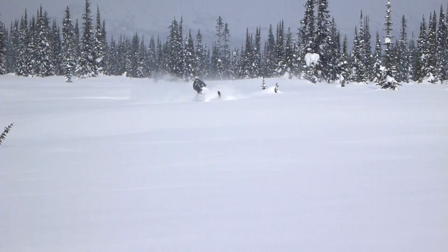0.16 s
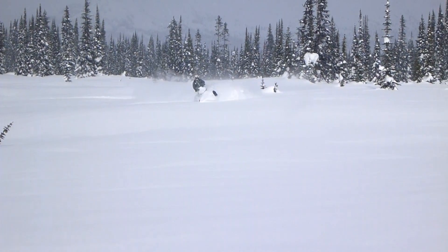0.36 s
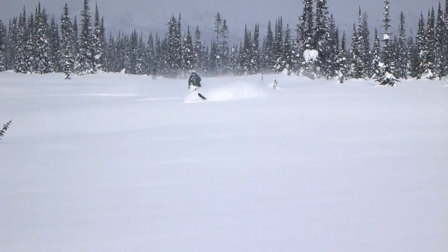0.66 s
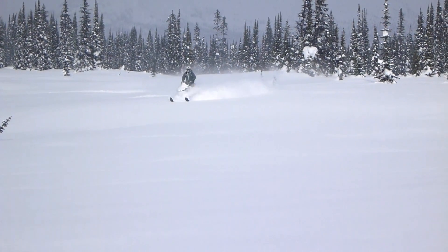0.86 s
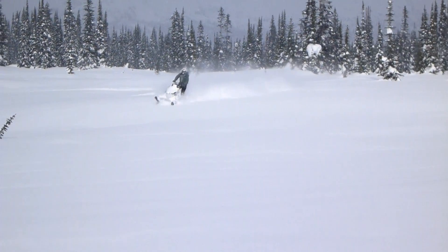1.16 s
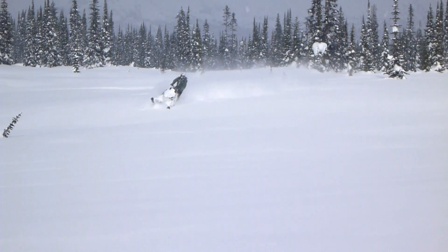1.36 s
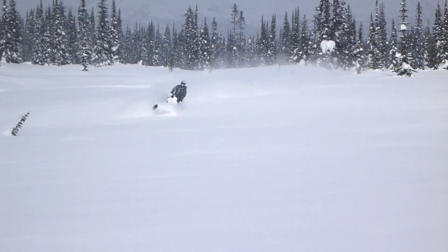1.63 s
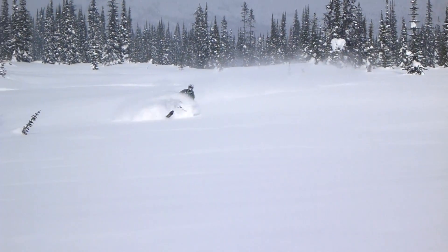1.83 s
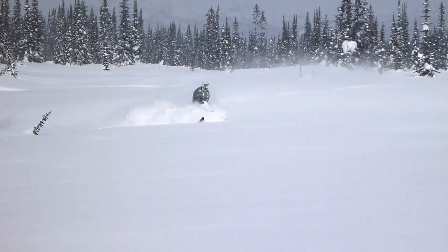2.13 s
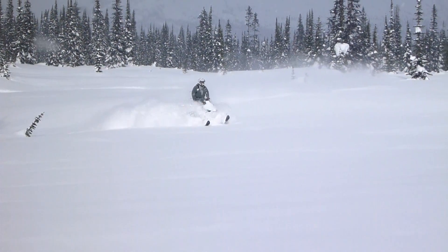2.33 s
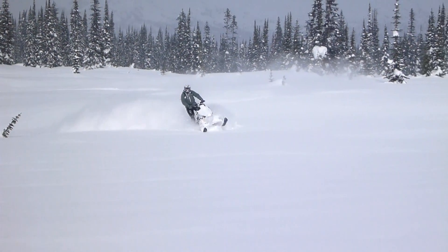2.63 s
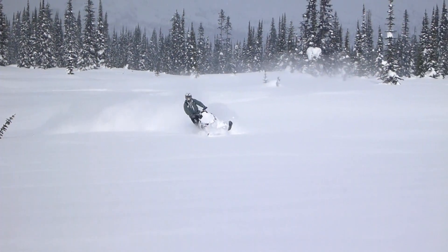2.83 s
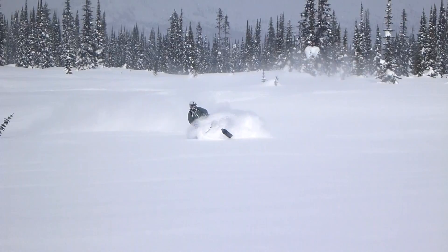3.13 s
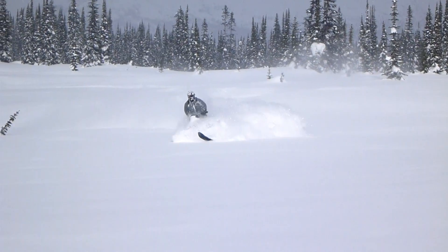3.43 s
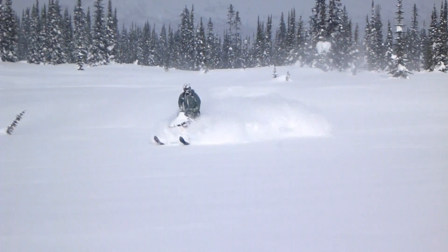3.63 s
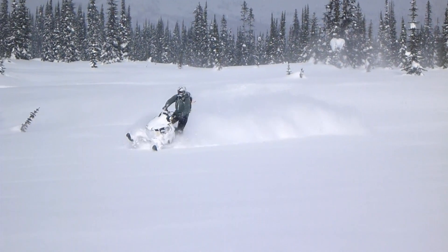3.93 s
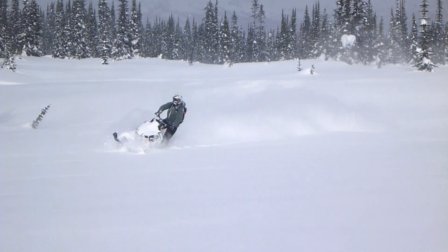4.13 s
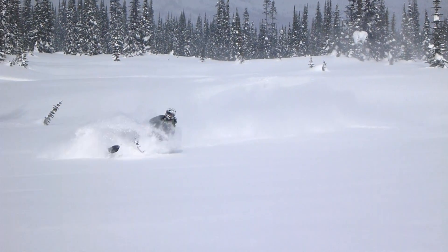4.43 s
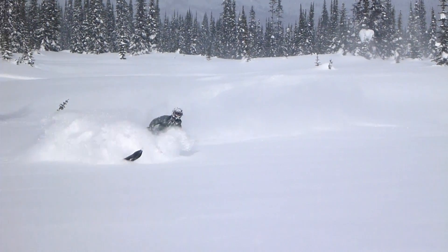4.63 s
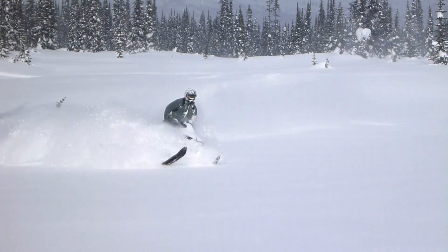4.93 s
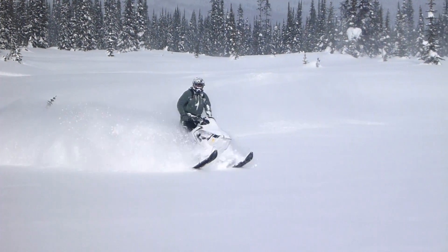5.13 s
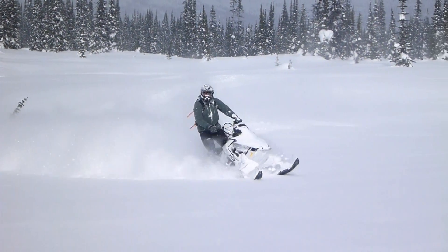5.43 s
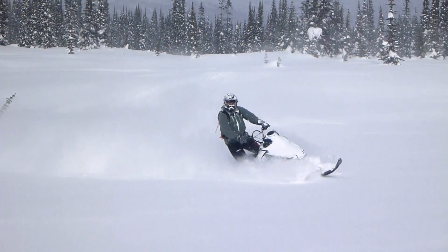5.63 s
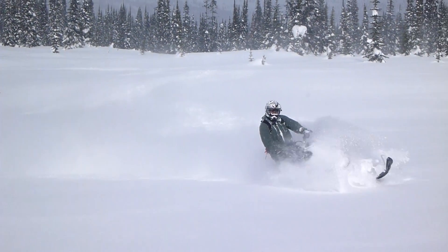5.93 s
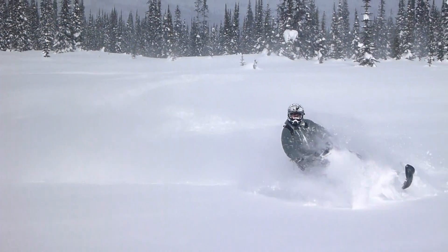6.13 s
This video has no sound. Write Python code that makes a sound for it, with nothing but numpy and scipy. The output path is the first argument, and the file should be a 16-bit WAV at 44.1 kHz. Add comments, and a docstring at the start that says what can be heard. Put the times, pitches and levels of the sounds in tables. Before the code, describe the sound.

In an open, snowy field edged by forest, a snowmobile approaches. From 0 to 1.1 s its two-stroke engine is a distant, muffled drone around 280 Hz, while low wind flutters and knocks the microphone, hardest near 0.8 s. From 1.1 to 1.9 s the exhaust opens into a harsh, ringing, nasal bark, then is smothered treble first. A weaker surge comes at 2.5-2.7 s. Another begins at 3.5 s, becoming bright and raspy from 3.8 to 4.4 s, cut off quickly with a hiss of thrown snow at 4.5 s. The last big bark runs 4.9-5.4 s, then fades. Revs waver only slightly throughout. Slightly flat, blurred forest echoes follow about 0.7 s behind. Track churn grows with approach; after 5.7 s a low drive whine, muffled drone and spray remain, with heavy wind thumps at 6.2 s to the end.

```python
"""A two-stroke snowmobile nears through deep powder: a muffled drone at first, with gusts buffeting the microphone.
Firing pulses ring its pipe at revs held nearly steady by the clutch, over churning track noise and a drive whine.
Turns from 1.1, 2.5, 3.5 and 4.9 s lift the exhaust clear: it barks, then snow closes over it, treble first.
The forest echoes each bark about 0.7 s later, a little flat; the gain control ducks wind and hiss after loud moments.
Thrown snow, shaped noise, hisses from 4.5 s, and the hardest wind buffets thump at the end."""
import sys
import numpy as np
from scipy import signal
from scipy.fft import rfft, irfft, next_fast_len
from scipy.io import wavfile
from scipy.ndimage import uniform_filter1d

SR = 44100
rng = np.random.default_rng(int(sys.argv[2]) if len(sys.argv) > 2 else 0)


def persist_wave(psi):
    """Save psi, clipped to +-1, as 16-bit WAV."""
    counts = np.round(np.clip(psi, -1, 1) * 32767).astype(np.int16)
    wavfile.write(sys.argv[1], SR, np.atleast_2d(counts).T)


N = 276941
TIME = np.arange(N) / SR  # seconds

# Colour of one exhaust pulse. Each row: frequency in Hz, relative level in dB.
PIPE_COLOUR = [(280, -20.5), (570, 0.5), (850, -3.5), (1130, -1.5), (1415, 12), (1700, 3), (1985, 5.5),
               (2270, -4), (2550, -2.5), (2950, -8), (3700, 1.5), (4250, -2.5), (4780, -14.5), (5400, -7.5),
               (7800, -30), (10800, -21), (15500, -40)]
# Booms as the sled heaves out of the snow or drops back. Each row: centre in seconds,
# boom in dB before each part's own offset, length in seconds, bark in dB.
HEAVE_BOOMS = [(1.331, -16, 0.039, -10), (2.037, -20, 0.14, -33.5), (2.732, -28.5, 0.17, -42),
               (3.87, -18.5, 0.035, -28.5), (4.564, -19, 0.052, -35), (5.042, -8.5, 0.048, -15.5),
               (5.176, -13, 0.08, -21)]


def from_db(db):
    """Decibels to gain."""
    return 10 ** (np.asarray(db) / 20)


def unit(x):
    """Scales to rms 1."""
    return x / np.sqrt(np.mean(x ** 2) + 1e-20)


def together(*gains):
    """The dB of unrelated sounds heard at once: their powers add."""
    return 10 * np.log10(sum(g ** 2 for g in gains) + 1e-12)


def curves(rows):
    """Each column after the time column, as a value per sample."""
    s, *columns = np.transpose(rows)
    return [np.interp(TIME, s, column) for column in columns]


def swells(rows):
    """Sums a smooth bell-shaped rise and fall in gain for each row of time, dB and length."""
    return sum(from_db(db) * np.exp(-.5 * ((TIME - s) / length) ** 2) for s, db, length in rows)


def read(points, hz):
    """A spectrum's dB at the given frequencies, read along a logarithmic axis."""
    f, db = np.transpose(points)
    return np.interp(np.log(hz + 1), np.log(f + 1), db)


def coloured(x, points):
    """Filters x by a spectrum and scales it to rms 1."""
    size = next_fast_len(N)
    gain = from_db(read(points, np.fft.rfftfreq(size, 1 / SR)))
    return unit(irfft(rfft(x, size) * gain, size)[:N])


def wander(rate):
    """Smooth random drift of rms 1 that changes about rate times a second."""
    count, control_rate = 8192, 1000  # control points, and control points per second
    hz = np.fft.rfftfreq(count, 1 / control_rate)
    slow = irfft(rfft(rng.standard_normal(count)) / (1 + (hz / rate) ** 4))
    return np.interp(TIME, np.arange(count) / control_rate, unit(slow))


def pipe_lag(grid):
    """The phase lag of a causal pipe: a crack, then the ring, found from the log gain by Hilbert transform."""
    log_gain = np.log(from_db(read(PIPE_COLOUR, grid)))
    mirrored = np.r_[log_gain, log_gain[-2:0:-1]]
    return -signal.hilbert(mirrored).imag[:len(grid)]


def exhaust(turns, hz, levels, count=7, shimmer_db=3.0, bounce=0.43, detour=0.000353, sway=.00005, flutter_db=0.04):
    """One sharp pressure pulse per firing rings the pipe; a bounce off the snow combs its treble."""
    # Orders 1 to 4, bark, rasp, fizz; rasp fades into fizz where they overlap.
    # Each row: first firing order, last firing order.
    group_orders = [(1, 1), (2, 2), (3, 3), (4, 4), (5, 9), (10, 28), (21, 55)]
    scatter = .0013  # share of a firing cycle, for each of the two drifts
    grid = np.fft.rfftfreq(4096, 1 / SR)
    lag = pipe_lag(grid)
    turns = turns + scatter * (wander(130.3) + wander(37))  # no two firings are timed alike
    # detour and sway are in seconds: the bounce's delay in firings shifts as the sled rolls
    late = (detour + sway * wander(7.6)) * hz
    out = np.zeros(N)
    for (first, last), db in zip(group_orders[:count], levels):
        orders = np.arange(first, last + 1)
        sizes = from_db(read(PIPE_COLOUR, orders * hz.mean()))
        if first > 9:  # rasp fades out and fizz fades in over orders 20 to 29
            sizes *= np.interp(orders, [20, 29], [first < 20, first > 20])
        sizes *= np.sqrt(2) / np.linalg.norm(sizes)
        group = np.zeros(N)
        for k, size in zip(orders, sizes):
            depth = bounce * np.clip(k / 10 - .5, 0, 1)
            comb = 1 + depth * np.cos(2 * np.pi * k * late)
            phase = 2 * np.pi * k * turns + np.interp(k * hz.mean(), grid, lag)
            group -= size * comb * np.cos(phase)
        # higher groups shimmer more
        shimmer = np.log10(first) * shimmer_db * (wander(150) + wander(16.7)) / 2
        out += group * from_db(db + shimmer)
    return out * from_db(flutter_db * wander(50))


def bared():
    """Gains of bark, rasp and fizz: each turn opens them quickly, holds them, and lets the snow close over."""
    # Turns that lift the exhaust clear. Each row: start, end and rise in seconds, bark, rasp and fizz in dB,
    # sag of the bark in dB per second, fade of the bark after the end in dB per second.
    lifts = [(1.137, 1.881, 0.16, -12.5, -24.5, -33.5, 9.5, 47),
             (2.509, 2.688, 0.082, -23.5, -46, -57.5, 27, 48),
             (3.537, 3.806, 0.13, -36, -56, -63, -3.5, 47),
             (3.803, 4.406, 0.086, -15.5, -24.5, -32, 4.7, 104.5),
             (4.933, 5.416, 0.18, -19, -25.5, -31, 9, 73)]
    rasp_fade, fizz_fade = 1.62, 2.25  # multiples of the bark's fade: snow swallows the treble first
    flare_gain, flare_s = 0.2, 0.019  # extra share of rasp and fizz as the pipe leaves and meets the snow
    gains = np.zeros((3, N))
    for start, end, rise, bark_db, rasp_db, fizz_db, sag, fade in lifts:
        opening = np.clip((TIME - start) / rise, 0, 1)
        held = np.clip(TIME - start, 0, end - start)
        sunk = np.maximum(TIME - end, 0)
        flare = 1 + flare_gain * swells([(start + rise, 0, flare_s), (end, 0, flare_s)])
        bark = from_db(bark_db - sag * held - fade * sunk)
        rasp = from_db(rasp_db - rasp_fade * fade * sunk) * flare
        fizz = from_db(fizz_db - fizz_fade * fade * sunk) * flare
        gains += opening * np.array([bark, rasp, fizz])
    return gains


def exhaust_levels(heave, uneven_db=1.1, uneven_rate=7, burble_db=3.5, burble_rate=14):
    """dB of orders 1 to 4, bark, rasp and fizz: muffled part plus turns and heaves; it burbles under the snow."""
    # The drone that carries through the snow. Each row: time in seconds, first and second firing order in dB.
    drone_rows = [(0, -50.5, -44.5), (.6, -43.5, -43), (1.12, -37, -34), (1.442, -40, -31),
                  (1.9, -41.5, -23.5), (2.382, -36, -43.5), (2.71, -30, -25.5), (3.1, -39.5, -34),
                  (3.782, -40, -32), (4.1, -37.5, -41.5), (4.369, -34, -24), (4.72, -31.5, -43),
                  (4.97, -30, -28.5), (5.48, -26, -33), (5.62, -27, -29.5), (5.9, -29, -30),
                  (6.28, -23, -20.5)]
    # Offsets of those two orders against a boom, in dB.
    drone_boom_db = [-13, -6.5]
    # How the snow shapes orders 3 and 4. Each row: buried level in dB at 0 s, gain from the approach
    # in dB per second, offset in dB against the bared bark, offset in dB against a boom.
    middle_rows = [(-61.5, 4.5, -18, -9), (-48.5, 1.7, -7.5, -8)]
    # Bright spits of fizz from the bare pipe. Each row: centre in seconds, level in dB, length in seconds.
    spit_rows = [(1.38, -31, .02), (3.825, -26.5, .014), (3.94, -26, 0.038), (5.33, -29, 0.078)]
    buried_bark_db, approach_db_per_s = -54.5, 2
    buried_rasp_db, buried_fizz_db = -65.5, -68
    bark, rasp, fizz = bared()
    drone = [together(from_db(db), heave * from_db(boom))
             for db, boom in zip(curves(drone_rows), drone_boom_db)]
    middle = [together(from_db(buried + approach * TIME), bark * from_db(bare), heave * from_db(boom))
              for buried, approach, bare, boom in middle_rows]
    heave_bark = swells([(s, db, length) for s, _, length, db in HEAVE_BOOMS])
    top = [together(bark, heave_bark, from_db(buried_bark_db + approach_db_per_s * TIME)),
           together(rasp, from_db(buried_rasp_db)),
           together(fizz, swells(spit_rows), from_db(buried_fizz_db))]
    covered = np.clip(1 - 2 * rasp / rasp.max(), 0, 1)
    upper = [db + uneven_db * wander(uneven_rate) + burble_db * covered * wander(burble_rate)
             for db in middle + top]
    return drone + upper


def blowdown(turns, levels, spit_db=2.5):
    """Each opening of the exhaust port lets out a decaying puff of turbulent gas, under bark, rasp and fizz."""
    # Puff offsets against bark, rasp and fizz, in dB.
    puff_db = [-22, -13, -6]
    decay = .28  # share of a firing cycle
    puffs = unit(0.9 + np.exp(-(turns % 1) / decay)) * from_db(spit_db * wander(38))
    gas = coloured(rng.standard_normal(N), PIPE_COLOUR)
    out = np.zeros(N)
    for edges, db, under in zip([[1200, 2740], [2700, 6000], [7000, 11700]], levels, puff_db):  # band edges in Hz
        band = signal.butter(3, edges, "band", fs=SR, output="sos")
        out += unit(signal.sosfilt(band, gas)) * from_db(db + under)
    return puffs * out


def crank(turns, first_order, half_db=-19, fall_db=-0.88, waver_db=3):
    """The two cylinders differ a little, which adds weak lines between the firing orders."""
    lines = np.zeros(N)
    for k in range(1, 10):
        level = from_db(fall_db * k + waver_db * wander(3.5))
        lines += level * np.cos(2 * np.pi * ((k + .5) * turns + rng.random()))
    return from_db(first_order + half_db) * np.sqrt(2) * lines


def engine_whine(turns):
    """A pure tone on the seventh firing order, steady with swells."""
    # Each row: centre in seconds, level in dB, length in seconds.
    swell_rows = [(4.3, -17.5, 0.091), (5.5, -24.5, 0.062), (5.93, -36.5, 0.15), (6.27, -30.5, 0.055)]
    steady_db = -52
    return np.sqrt(2) * np.cos(2 * np.pi * 7 * turns) * (from_db(steady_db) + swells(swell_rows))


def track(turns, heave, clump_db=0.5, throb=0.033):
    """Clumpy snow and drive noise, pulsed by the engine and louder in each heave, with the whine of the drive."""
    # Each row: frequency in Hz, relative density in dB per Hz.
    churn_colour = [(60, -6), (150, 2), (400, -7.5), (700, 6), (1300, 5.5), (1700, 1), (2000, 1),
                    (2600, -7), (3600, -5.5), (5000, -16), (8000, -48), (15500, -39)]
    # Drive whine, sinking as the sled slows. Each row: time in seconds, centre pitch in Hz, level in dB.
    drive_rows = [(0, 236, -46), (1.1, 232, -70), (3, 240, -61), (5.4, 241, -50.5), (5.75, 220, -39),
                  (6, 211, -37.5), (6.28, 208, -29)]
    start_db, approach_db_per_s, heave_db = -44.5, 1.42, -17.5  # heave_db is an offset against a boom
    level = together(from_db(start_db + approach_db_per_s * TIME), heave * from_db(heave_db))
    pulsed = rng.standard_normal(N) * (1 + throb * np.cos(2 * np.pi * turns))
    churn = coloured(pulsed, churn_colour) * from_db(level + clump_db * wander(30))
    hz, db = curves(drive_rows)
    drive_turns = np.cumsum(hz * (1 + 0.0089 * wander(16))) / SR
    whine = np.sqrt(2) * np.sin(2 * np.pi * drive_turns)
    return churn + whine * from_db(db)


def thrown_snow():
    """Sheets of thrown snow hiss as swells of shaped noise."""
    # Each row: centre in seconds, level in dB, length in seconds.
    sheets = [(4.5, -27.5, 0.049), (5.87, -31.5, 0.011), (6.04, -36, 0.045), (6.245, -33.5, 0.036)]
    # Each row: frequency in Hz, relative density in dB per Hz.
    spray_colour = [(500, -22), (1400, 5.5), (2500, -25), (3600, 2), (4600, -21), (5500, -3.5), (7000, -19),
                    (10500, -17), (15500, -38)]
    return coloured(rng.standard_normal(N), spray_colour) * swells(sheets)


def forest(hz, levels, delay=0.698, spread=0.066):
    """The sled runs away from the trees, so their echo comes back flat and beats against the direct sound."""
    # Exhaust aimed back at the forest. Each row: time in seconds, level in dB.
    backward = [(0, -8), (1.38, -6), (1.6, -16), (2.6, -19.5), (3.85, -7), (4.4, -20.5), (6.28, -29)]
    # Pitch as the trees hear it. Each row: time in seconds, centre Doppler factor.
    doppler_rows = [(0, .97), (1.3, .976), (1.5, .962), (1.7, .948), (3, .975), (3.85, .967), (4.15, .953),
                    (5, .97)]
    db, = curves(backward)
    doppler, = curves(doppler_rows)
    turns = np.cumsum(hz * doppler * (1 + 0.00897 * wander(29.64))) / SR
    sent = exhaust(turns, hz, levels, count=6) * from_db(db)  # without the fizz
    band = signal.butter(2, [500, 2300], "band", fs=SR, output="sos")
    carried = signal.sosfilt(band, sent)
    t = np.arange(SR) / SR
    # sparse random reflections, bunched around the delay (delay and spread in seconds)
    hits = rng.standard_normal(SR) * (rng.random(SR) < 1500 / SR)
    trunks = hits * np.exp(-.5 * ((t - delay) / spread) ** 2)
    return signal.fftconvolve(carried, trunks / np.linalg.norm(trunks))[:N]


def wind(wind_db=-1, eddy_db=2, lump_db=3.5, buffet_db=-4, bright_hz=750, rise=0.0012, thump_hz=170, thump=1.0):
    """Lumpy eddies at the microphone; the hardest buffets thump at once and reach higher."""
    # Each row: frequency in Hz, relative density in dB per Hz.
    wind_colour = [(20, -24), (45, -15), (70, -1.5), (130, 1.5), (220, -2.5), (350, -7.5), (600, -12),
                   (1000, -35), (2000, -73), (5000, -63)]
    # The breeze between gusts. Each row: time in seconds, level in dB before eddies and the wind_db trim.
    breeze_rows = [(0, -38), (1.3, -38), (1.6, -53), (2.1, -45.5), (3.7, -37), (4.2, -58), (4.55, -38),
                   (5.35, -45.5), (6.28, -26.5)]
    # Each row: centre in seconds, level in dB before the wind_db trim, length in seconds.
    gust_rows = [(.22, -32, .03), (.51, -27.5, 0.037), (.73, -20.5, 0.024), (.82, -24, 0.095),
                 (1.23, -29.5, 0.037), (1.35, -23.5, 0.035), (2.02, -29, 0.036), (2.25, -32.5, 0.017),
                 (2.35, -28, 0.026), (2.46, -26.5, 0.027), (2.66, -27, 0.022), (3.22, -31, 0.084),
                 (3.55, -34, 0.03), (3.87, -35.5, 0.038), (4.82, -34, .02), (6.12, -21.5, 0.035),
                 (6.24, -20.5, 0.069)]
    # Single hard buffets. Each row: start in seconds, level in dB before the buffet_db trim, decay in seconds.
    buffet_rows = [(0.175, -25.5, 0.011), (0.375, -26, 0.038), (0.455, -31, .02), (0.708, -20, 0.017),
                   (0.761, -15, 0.0097), (0.859, -10, 0.0047), (3.427, -23, 0.012), (6.196, -2, 0.017),
                   (6.269, -3, 0.028)]
    breeze_db, = curves(breeze_rows)
    level = together(from_db(breeze_db + eddy_db * wander(19)), swells(gust_rows))
    lumpy = rng.standard_normal(N) * from_db(lump_db * wander(30))
    out = coloured(lumpy, wind_colour) * from_db(level + wind_db)
    flurry_colour = [(30, -30), (100, -4), (230, 0), (bright_hz, -7), (1500, -21), (4000, -48), (12000, -75)]
    flurry = coloured(rng.standard_normal(N), flurry_colour)
    for s, db, decay in buffet_rows:
        age = np.maximum(TIME - s, 0)
        blow = np.minimum(age / rise, 1) * np.exp(-age / decay)
        out = out + from_db(db + buffet_db) * blow * (flurry + thump * np.sin(2 * np.pi * thump_hz * age))
    return signal.sosfilt(signal.butter(2, 45, "high", fs=SR, output="sos"), out)


def far_hiss(air_db=-45.0):
    """Steady shaped noise as a distant hiss."""
    # Each row: frequency in Hz, relative density in dB per Hz.
    air_colour = [(100, -1.5), (1000, 2.5), (2000, -0.5), (3500, -20), (6000, -14), (10000, -18.5),
                  (15500, -23.5)]
    return coloured(rng.standard_normal(N), air_colour) * from_db(air_db)


def scene(jitter=0.0014, lead=0.024):
    """Sled, thrown snow, echo, wind and far hiss, driven by one engine speed."""
    # Engine speed, rising with each turn and sagging in deep snow.
    # Each row: time in seconds, firings per second before the jitter.
    revs = [(0, 278), (.4, 284), (1.05, 280), (1.35, 283), (1.83, 283.6), (2.1, 279), (2.3, 269),
            (2.45, 282), (2.7, 288.5), (2.9, 283.5), (3.53, 277.5), (3.85, 283.8), (4.05, 285.7),
            (4.42, 278.3), (4.85, 275), (5.15, 283.5), (5.3, 284.8), (5.87, 277.7), (6.28, 283)]
    hz, = curves(revs)
    turns = np.cumsum(hz * (1 + jitter * wander(30.0))) / SR  # firing cycles so far
    heave = swells([row[:3] for row in HEAVE_BOOMS])
    levels = exhaust_levels(heave)
    engine = exhaust(turns, hz, levels) + crank(turns, levels[0]) + engine_whine(turns)
    gas = blowdown(turns + lead, levels[-3:])  # lead: share of a firing cycle
    sled = engine + gas + track(turns, heave) + thrown_snow()
    return (sled + forest(hz, levels) + wind() + far_hiss())[None]


def gain_control(x, threshold_db=-22, share=0.44, recovery_db_per_s=4.5, size=2600):
    """Takes back a share of the level above the threshold, then creeps up again, so that wind and hiss duck."""
    # mean power over the last size samples
    power = abs(uniform_filter1d(x[0] ** 2, size, origin=size // 2 - 1))
    power_db = 10 * np.log10(power + 1e-12)
    fall = TIME * recovery_db_per_s
    held_db = np.maximum.accumulate(power_db + fall) - fall  # peaks that fall slowly
    over_db = np.maximum(held_db - threshold_db, 0)
    return x / from_db(share * uniform_filter1d(over_db, size // 4))


def record(dry):
    """The microphone's two dips, the gain control, then the band limit."""
    # Narrow dips in the microphone's response. Each row: frequency in Hz, width in Hz.
    mic_dips = [(2895, 346), (11780, 1200)]
    edge_hz = 15750
    for hz, width in mic_dips:
        dry = signal.lfilter(*signal.iirnotch(hz, hz / width, SR), dry)
    low_pass = signal.firwin(711, edge_hz, window=("kaiser", 9), fs=SR)
    return signal.oaconvolve(gain_control(dry), low_pass[None], "same")


dry = scene()
out = record(dry)
persist_wave(out)
```